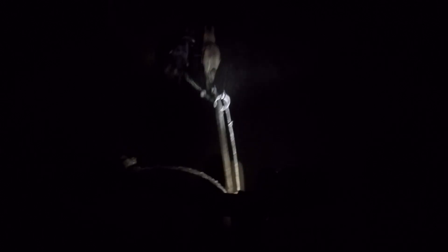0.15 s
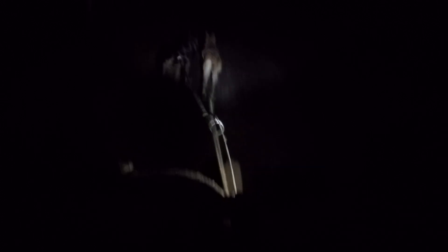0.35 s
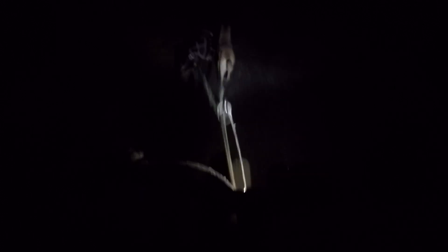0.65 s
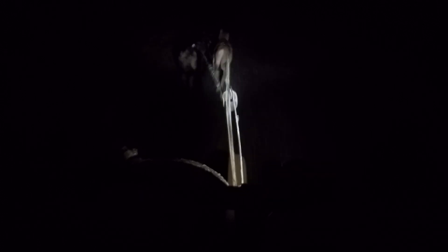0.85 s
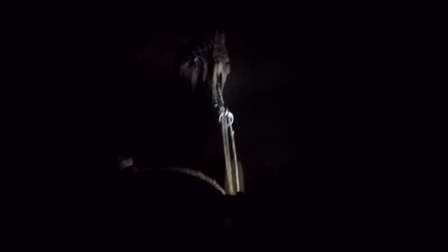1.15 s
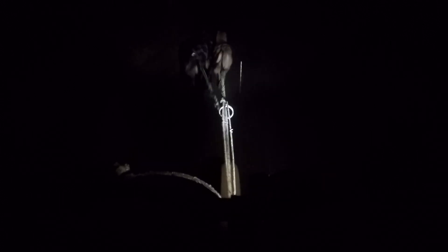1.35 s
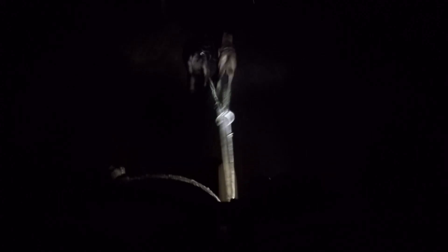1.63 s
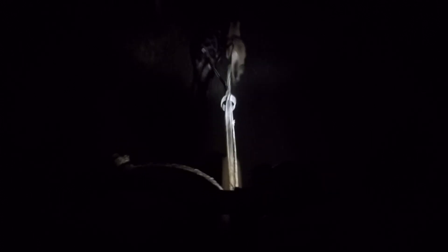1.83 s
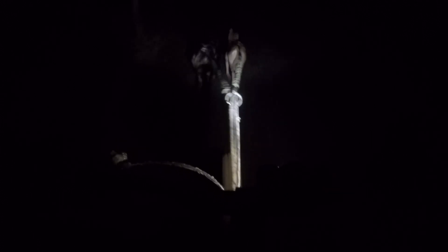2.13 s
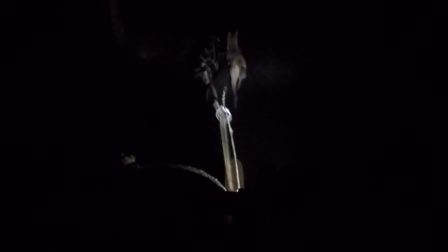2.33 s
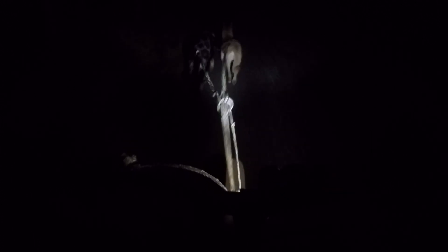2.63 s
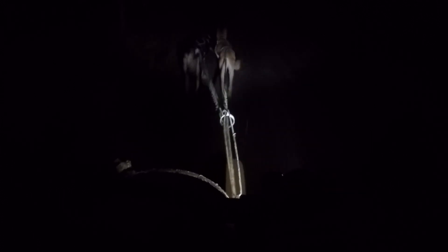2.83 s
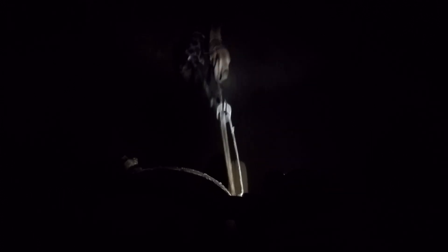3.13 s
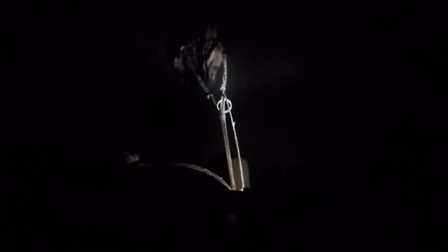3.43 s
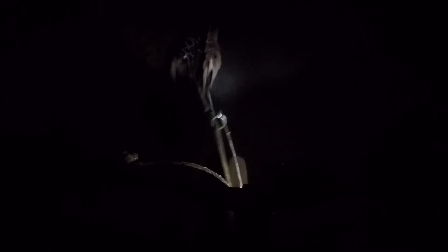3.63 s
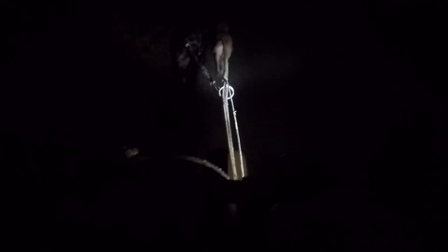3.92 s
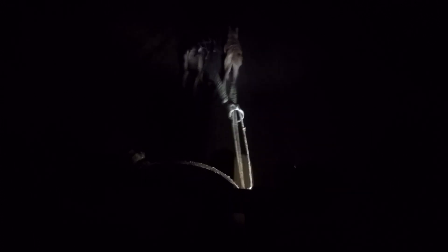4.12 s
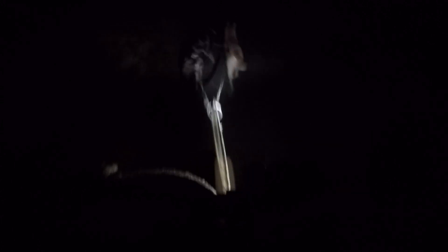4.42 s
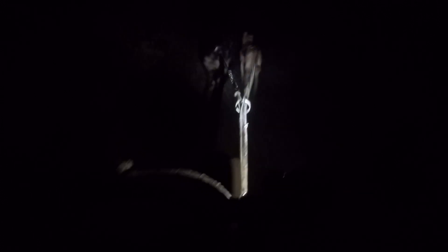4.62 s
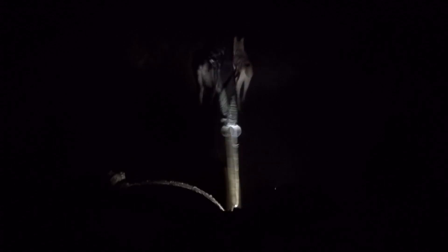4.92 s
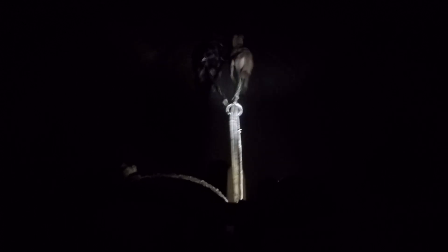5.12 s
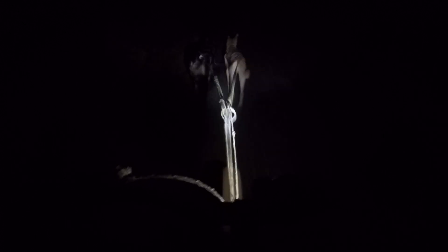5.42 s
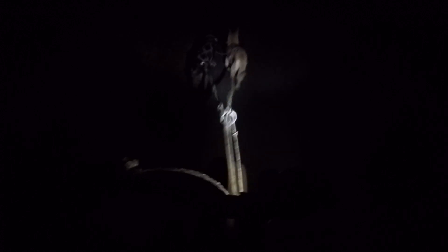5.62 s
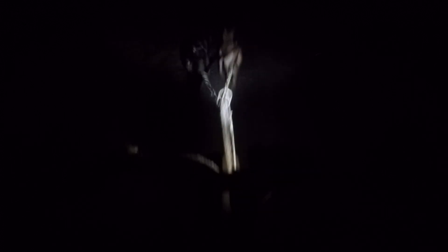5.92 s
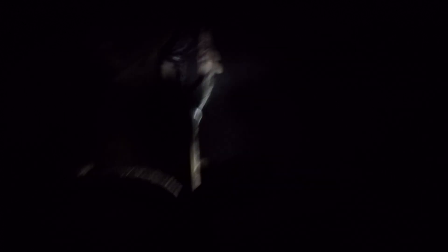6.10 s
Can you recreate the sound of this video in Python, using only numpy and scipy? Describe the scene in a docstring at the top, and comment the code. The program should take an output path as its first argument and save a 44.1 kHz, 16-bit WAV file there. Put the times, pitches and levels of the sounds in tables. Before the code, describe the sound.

A kick scooter rolls on a gritty track at night, heard from a microphone riding close on board. Grit keeps a fine, crackling metallic rattle going in the deck, stem and loose clamp, with irregular knocks and ticks. A sharp knock stands out after two seconds, then thumps come near three, five and the end. Low road drumming and soft wind buffeting lie beneath, outdoors with no echo.

```python
"""A gritty track at night: a kick scooter rolls along it, the microphone riding close on board.
Grit under the wheels shakes the deck, fork, stem tube and a loose clamp, each ringing briefly at its own
modes of noise-driven resonance; bigger stones knock, scuff, tick and spit, and edges thump the frame.
Beneath, the road drums through the frame and wind presses on the microphone as shaped low noise,
over a faint steady hiss of tyre and air."""
import sys
import numpy as np
from scipy import signal
from scipy.fft import rfft, irfft, next_fast_len
from scipy.io import wavfile
from scipy.ndimage import uniform_filter1d

SR = 44100
rng = np.random.default_rng(int(sys.argv[2]) if len(sys.argv) > 2 else 0)


def store_pcm(level_fs):
    """Save levels as 16-bit WAV."""
    pcm = np.round(np.clip(level_fs, -1, 1) * 32767).astype(np.int16)
    wavfile.write(sys.argv[1], SR, np.atleast_2d(pcm).T)


N = 276066

# How hard the grit shakes the frame. Each row: time in seconds, stem, deck and clamp level in [dB].
GRIT_SHAKING = [(0, -64, -69.5, -66.5), (.22, -61, -62.5, -70.5), (.36, -57.5, -60.5, -64),
                (.67, -61, -64, -68.5), (1.1, -61.5, -63.5, -68), (1.23, -55, -63.5, -61.5),
                (1.45, -64.5, -64.5, -70.5), (1.56, -57.5, -64, -69), (1.7, -63.5, -64.5, -70),
                (2.0, -60.5, -66.5, -70), (2.12, -65.5, -67.5, -71), (2.24, -59.5, -67, -68.5),
                (2.55, -61, -68.5, -67), (2.68, -55, -64.5, -65.5), (2.79, -60.5, -70, -72.5),
                (2.91, -54.5, -60, -62.5), (3.13, -62, -69, -70.5), (3.35, -66.5, -70.5, -72),
                (3.5, -63, -69.5, -68.5), (3.91, -62, -65, -70.5), (4.05, -57.5, -63.5, -65.5),
                (4.36, -56.5, -62.5, -67), (4.47, -55.5, -61, -67.5), (4.69, -54.5, -61, -63),
                (4.81, -58, -60, -65.5), (5.14, -57.5, -64.5, -67.5), (5.3, -58.5, -66, -66),
                (5.8, -57.5, -65, -66.5), (5.92, -56, -61, -63), (6.04, -58.5, -59, -64),
                (6.15, -59, -60, -70), (6.26, -51, -51, -58)]
# Rubs that swell briefly in the deck. Each row: middle in [s], level in [dB], width in [s].
DECK_RUBS = [(.05, -60, 0.025), (.14, -60, 0.06), (.23, -70, .03), (.45, -56, 0.029), (.56, -59, 0.02),
             (.86, -59, 0.04), (1.15, -74, 0.016), (1.24, -60.5, 0.045), (2.53, -60, 0.025),
             (2.82, -62, 0.05), (3.4, -59.5, 0.025), (3.85, -71, .03), (3.97, -61, 0.026),
             (4.06, -59, 0.027), (4.37, -60.5, 0.038), (4.88, -64, .04), (4.97, -60, 0.013),
             (5.3, -56, 0.0096), (5.37, -66.5, 0.017), (5.53, -57, 0.033), (5.91, -59, 0.066),
             (6.21, -56.5, 0.037)]

# Ringing modes of each part. Each row: frequency in [Hz], width in [Hz], relative level in [dB].
DECK_MODES = [(323, 104, -6.5), (463, 150, -10.5), (798, 140, -4.5), (899, 63, -0.5), (995, 61, 0),
              (1073, 86, -4.5)]
FORK_MODES = [(1325, 58, 2), (1605, 270, -3)]
STEM_MODES = [(1810, 380, -10.5), (2187, 112, 3.5), (2421, 122, 4), (2511, 73, 5), (2806, 180, 5.5),
              (3005, 109, 3.5), (3394, 178, 1.5), (3940, 140, -4.5)]
CLAMP_MODES = [(4360, 170, 3.5), (5320, 180, -12.5), (5105, 570, 8.5), (5300, 120, -7)]
# The fizz above the clamp and the spray of thin grit, with the same columns: [Hz], [Hz], [dB].
FIZZ_MODES = [(6820, 370, 3.5), (7930, 1200, -0.5), (8750, 720, 0), (9870, 770, -4)]
SPRAY_MODES = [(11040, 1200, -2.2), (12120, 540, 0.54), (13200, 1900, -0.78), (14400, 1400, -0.21)]

# Stones knocking through the stem. Each row: moment in [s], peak level in [dB].
STEM_KNOCKS = [(0.0266, -44), (0.3154, -37.5), (0.3552, -44), (0.4262, -42.5), (0.4444, -40), (0.4786, -45),
               (0.6537, -43), (0.8221, -39.5), (0.8458, -39.5), (0.8684, -42), (0.8904, -46), (0.9373, -47),
               (0.995, -42.5), (1.1398, -44), (1.1568, -41), (1.1922, -39), (1.208, -47), (1.2288, -41),
               (1.2604, -43), (1.295, -41.5), (1.3124, -44.5), (1.3944, -44.5), (1.48, -44), (1.4914, -44),
               (1.563, -47), (1.584, -43), (1.6033, -43.5), (1.6617, -45), (2.2394, -26.5), (2.3669, -38),
               (2.5277, -48), (2.6892, -44), (2.714, -45), (2.7606, -45), (2.8794, -39.5), (2.9183, -38.5),
               (2.9597, -41), (3.1308, -47.5), (3.1462, -39), (3.1956, -45), (3.3079, -43.5), (3.455, -45),
               (3.5418, -45.5), (3.6657, -44), (3.7847, -42), (4.052, -42), (4.0906, -46), (4.1888, -43),
               (4.203, -42), (4.2418, -44), (4.2986, -39.5), (4.3241, -51), (4.3595, -40), (4.3859, -45),
               (4.4196, -44), (4.5226, -43.5), (4.687, -39), (4.6957, -39), (4.7154, -41), (4.7628, -36.5),
               (4.791, -35), (4.8968, -48), (4.903, -43), (4.9352, -45), (4.9472, -40.5), (4.9552, -44),
               (4.9696, -39), (4.983, -43), (5.0389, -50), (5.0993, -37), (5.1146, -44), (5.1502, -44.5),
               (5.253, -39), (5.2958, -39), (5.324, -35), (5.4628, -32), (5.4794, -49), (5.6065, -37),
               (5.6298, -38), (5.636, -44), (5.6804, -44), (5.8333, -42), (5.901, -42), (5.9766, -47),
               (6.0412, -45.5), (6.0901, -43), (6.1244, -49.5), (6.2534, -29)]
# Ticks of the loose clamp. Each row: moment in [s], clamp peak in [dB], fizz peak in [dB].
CLAMP_TICKS = [(0.2743, -51, -59), (0.3147, -47, -52), (0.3257, -44, -54), (0.3561, -37, -54),
               (0.4564, -50, -56), (0.5881, -49, -61), (0.623, -45, -55), (0.8218, -41, -48),
               (0.845, -51, -53), (0.9373, -50, -56), (0.9956, -49, -64), (1.1263, -55, -55),
               (1.1393, -45, -52), (1.157, -38.5, -46), (1.1694, -41, -50), (1.1932, -40, -54),
               (1.2074, -43, -56), (1.2214, -51, -45.5), (1.229, -38, -47), (1.2471, -38, -48),
               (1.2624, -52, -52), (1.2945, -35, -48), (1.3508, -49, -59), (1.3673, -51, -62),
               (1.3947, -41.5, -59), (1.4797, -41, -52), (1.4914, -42.5, -50), (1.5044, -49, -57),
               (1.5254, -45, -54), (1.571, -40, -52), (1.5835, -35.5, -49), (1.6004, -42, -54),
               (2.2393, -48.5, -53), (2.367, -47.5, -50), (2.8799, -50, -61), (2.9664, -50, -54),
               (3.1453, -51, -60), (3.3074, -54, -56), (3.9739, -45.5, -61), (3.9908, -47, -58),
               (4.0522, -38, -47), (4.0741, -47, -54), (4.0906, -47, -61), (4.148, -46, -59),
               (4.1659, -51, -55), (4.2986, -48, -57), (4.3595, -52, -51), (4.376, -47, -58),
               (4.4184, -48, -56), (4.704, -45, -56), (4.7227, -46, -56), (4.7366, -44, -56),
               (4.8958, -42.5, -59), (4.9222, -47, -57), (5.0245, -47, -57), (5.0878, -50, -54),
               (5.1492, -46.5, -56), (5.2944, -50, -58), (5.3238, -49, -50), (5.4625, -54, -54),
               (5.6067, -46, -60), (5.6316, -50, -54), (5.6795, -46, -56), (5.6974, -50, -49),
               (6.0397, -48, -60), (6.0881, -51, -57)]
# Scuffs that boom in deck and fork. Each row: moment in [s], deck peak in [dB], fork peak in [dB].
DECK_FORK_SCUFFS = [(0.218, -54, -58), (0.31, -52, -48), (0.443, -53, -48), (0.739, -50, -70),
                    (1.22, -53, -52), (1.461, -69, -54), (2.239, -60, -41.5), (2.83, -55, -54),
                    (3.13, -66, -50), (3.144, -60, -47), (3.779, -66, -53), (4.109, -52, -59),
                    (4.683, -61, -51), (4.784, -55, -50), (4.972, -50, -60), (5.019, -62, -51),
                    (5.051, -53, -49), (5.098, -60, -47), (5.151, -55, -49.5), (5.296, -40.5, -44),
                    (5.683, -65, -48), (5.832, -57, -45), (5.892, -49, -60), (6.128, -51.5, -58),
                    (6.193, -46, -58), (6.211, -49, -55), (6.252, -54, -42)]
# Thin grit spitting from the tread. Each row: moment in [s], peak level in [dB].
TREAD_SPITS = [(0.0578, -58), (0.3162, -43), (0.4574, -51), (0.8215, -54), (0.8739, -51), (0.8884, -57),
               (1.1568, -54), (1.1694, -57), (1.1927, -56), (1.2306, -54), (1.2481, -55), (1.2945, -52),
               (1.3887, -58), (1.6636, -55), (1.6871, -54), (2.137, -59), (2.6419, -58), (2.9831, -54),
               (3.3892, -58), (3.7174, -61), (3.7773, -59), (3.7904, -60), (3.8023, -58), (3.9659, -59),
               (4.0522, -55), (4.2314, -59), (4.7037, -60), (4.7366, -58)]
# The wheel drops over an edge. Each row: start in [s], level before rise and decay in [dB],
# settled pitch in [Hz], decay time to -60 dB in [s], rise time in [s].
EDGE_THUMPS = [(2.805, -42, 133, 0.082, .008), (5.299, -40, 79.6, 0.11, 0.0021),
               (6.2, -35, 98, 0.31, 0.0069)]

# Level of the road drumming. Each row: time in [s], level in [dB].
ROAD_DRUMMING = [(0.0, -61), (0.07, -43.5), (0.1, -54.5), (0.45, -52), (0.56, -65), (0.59, -42),
                 (0.64, -51), (1.38, -53), (1.41, -50), (3.59, -55), (3.63, -52.5), (3.84, -56.5),
                 (4.01, -49.5), (4.31, -54.5), (4.48, -48.5), (4.55, -54.5), (5.27, -55), (5.32, -44.5),
                 (5.37, -59), (6.19, -48), (6.22, -40), (6.26, -54)]
# Gusts on the microphone. Each row: middle in [s], level in [dB], width in [s].
WIND_GUSTS = [(.05, -47.5, 0.036), (.26, -42, 0.057), (.41, -39.5, 0.032), (.62, -39.5, 0.12),
              (.84, -41.5, 0.077), (1.01, -43.5, 0.034), (1.11, -40, .04), (1.27, -42.5, 0.068),
              (1.5, -40, 0.074), (1.6, -41.5, 0.026), (1.69, -42.5, 0.042), (1.81, -43.5, 0.022),
              (1.93, -47.5, 0.043), (2.37, -44.5, 0.091), (2.61, -39, 0.026), (2.94, -41.5, 0.027),
              (3.17, -43.5, .07), (3.46, -47, 0.039), (3.63, -42.5, 0.016), (3.79, -45.5, 0.11),
              (4.11, -39, 0.084), (4.36, -40.5, 0.054), (4.48, -38.5, 0.02), (4.66, -42.5, 0.16),
              (5.0, -40, 0.083), (5.19, -36.5, 0.034), (5.35, -41, 0.028), (5.6, -46.5, 0.11),
              (5.86, -42.5, 0.035), (6.05, -44.5, 0.13)]
# Noise colours of road, wind and hiss. Each row: frequency in [Hz], relative density in [dB per Hz].
ROAD_COLOUR = [(40, -21), (62, -2), (85, 3.5), (100, -2), (120, -11), (145, -17), (175, -40.5), (260, -40)]
WIND_COLOUR = [(3, -34), (8, -9), (14, -6), (20, -0.5), (27, -0.5), (34, -5), (41, -14), (52, -16),
               (70, -21.5), (110, -59)]
HISS_COLOUR = [(88, -32), (150, 7.5), (572, -6.5), (1320, -6.5), (1980, -18), (2860, -3), (3760, -5),
               (5130, -11), (6110, -14), (14300, -37), (15500, -72)]

KNOCK_T60, TICK_T60, SCUFF_T60, SPIT_T60 = 0.023, 0.018, 0.022, 0.023  # chatter decay to -60 dB, s
# Fizz and spray follow the clamp: level at its mean shaking (dB) and share of its swings
FIZZ_DB, FIZZ_FOLLOW = -71.5, 0.44
SPRAY_DB, SPRAY_FOLLOW = -75.5, 0.28
BOUNCE_DB, BOUNCE_PER_S = 2, 12  # chance lumps in the drumming: rms depth, fastest rate
BREEZE_DB = -52  # steady wind under the gusts
HISS_DB = -63.5
EDGE_HZ = 15420  # upper band limit of the recorder


def rattle():
    """Grit shakes all parts at once, each part also chatters by itself, and rolling adds a steady force."""
    shared = jolts(240, spread_db=5.0, t60=0.03)
    stem_db = column(GRIT_SHAKING, count=1)
    deck_db = swells(DECK_RUBS, column(GRIT_SHAKING, count=2))
    clamp_db = column(GRIT_SHAKING, count=3)
    swing_db = clamp_db - clamp_db.mean()
    fizz_db = FIZZ_DB + FIZZ_FOLLOW * swing_db
    spray_db = SPRAY_DB + SPRAY_FOLLOW * swing_db
    # Each row: modes, level in dB, share of the common jolts, steady rolling force
    parts = [(DECK_MODES + FORK_MODES, deck_db, 0.4, 0.9),
             (STEM_MODES, stem_db, 0.6, 0.3),
             (CLAMP_MODES, clamp_db, 0.6, 0.4),
             (FIZZ_MODES, fizz_db, 0.55, 0.9),
             (SPRAY_MODES, spray_db, 0.3, 0.9)]
    out = np.zeros(N)
    for modes, db, share, steady in parts:
        own = jolts(300, spread_db=3.5, t60=0.0093)
        force = share * shared + (1 - share) * own + steady
        out += gain_of(db) * evened(ring(force, modes))
    return out


def jolts(per_s, spread_db, t60):
    """Force of many small stones: random moments, a few large, each pressing softly and dying quickly."""
    strength = gain_of(np.clip(spread_db, 0, 5) * np.minimum(rng.exponential(1, N), 3))
    hits = strength * (rng.random(N) < per_s / SR)
    force = signal.lfilter([1], [1, -gain_of(-60 / (t60 * SR))], hits)
    return evened(uniform_filter1d(force, size=70))  # softened over 70 samples


def ring(force, modes):
    """Every mode takes the force at its own spot of the part, so each gets its own fine grain."""
    out = 0
    for hz, width, db in modes:
        r = np.exp(-np.pi * width / SR)
        resonance = [1, -2 * r * np.cos(2 * np.pi * hz / SR), r * r]
        grain = force * rng.standard_normal(force.shape)
        out = out + gain_of(db) * (1 - r) * signal.lfilter([1, 0, -1], resonance, grain)
    # A part radiates little outside its own range
    edges = [0.8 * modes[0][0], min(1.15 * modes[-1][0], 0.45 * SR)]
    return signal.sosfilt(signal.butter(3, edges, "bandpass", fs=SR, output="sos"), out)


def knocks():
    """Bigger stones knock the stem, a hard contact ringing the tube's modes."""
    return blows(*np.transpose(STEM_KNOCKS), KNOCK_T60, STEM_MODES, rise=0.001508)


def ticks():
    """The loose clamp ticks, ringing its own modes and a higher fizz together."""
    s, clamp_db, fizz_db = np.transpose(CLAMP_TICKS)
    clamp = blows(s, clamp_db, TICK_T60, CLAMP_MODES, rise=0.00082)
    return clamp + blows(s, fizz_db, TICK_T60, FIZZ_MODES, rise=0.001)


def scuffs():
    """Scuffs boom in deck and fork, with a slower contact for the deck."""
    s, deck_db, fork_db = np.transpose(DECK_FORK_SCUFFS)
    deck = blows(s, deck_db, SCUFF_T60, DECK_MODES, rise=0.00345)
    return deck + blows(s, fork_db, SCUFF_T60, FORK_MODES, rise=0.00193)


def spits():
    """Thin grit spits from the tread in short bursts of high, broad resonances."""
    return blows(*np.transpose(TREAD_SPITS), SPIT_T60, SPRAY_MODES, rise=0.0022)


def blows(s, peak_db, t60, modes, rise):
    """Each blow is a short rounded contact and a decaying chatter; it rings one part."""
    t = np.arange(3000) / SR
    contact = (t / rise * np.exp(1 - t / rise)) ** 3
    chatter = 1.8 * (1 - np.exp(-t / rise)) * gain_of(-60 * t / t60)
    sounds = ring(np.tile(contact + chatter, (len(s), 1)), modes)
    out = np.zeros(N)
    for start, db, blow in zip(s, peak_db, sounds):
        add(out, max(start - rise / 2, 0), gain_of(db) * blow / abs(blow).max())
    return out


def thumps():
    """The frame springs on the tyre for some cycles, starting sharp and sagging in pitch."""
    t = np.arange(8000) / SR
    out = np.zeros(N)
    for s, db, hz, t60, rise in EDGE_THUMPS:
        turns = hz * (t + 0.0121 * (1 - np.exp(-t / 0.0031)))  # the pitch sags with a 3.1 ms constant
        envelope = gain_of(db - 60 * t / t60) * (1 - np.exp(-t / rise)) ** 2
        add(out, s, envelope * np.sin(2 * np.pi * turns))
    return out


def road_drumming():
    """The road drums through the frame on the tyre's bounce: low noise whose level comes in lumps."""
    db = column(ROAD_DRUMMING, count=1) + BOUNCE_DB * wander(BOUNCE_PER_S)
    return gain_of(db) * steadied(noise(ROAD_COLOUR), size=3000)


def wind():
    """Gusts over a steady breeze press on the microphone as very low noise."""
    return gain_of(swells(WIND_GUSTS, BREEZE_DB)) * steadied(noise(WIND_COLOUR), size=5000)


def hiss():
    """Tyre and air leave a faint hiss: coloured noise at a steady level."""
    return gain_of(HISS_DB) * noise(HISS_COLOUR)


def noise(spectrum):
    """Steady noise of the given colour, rms 1."""
    size = next_fast_len(N)
    hz = np.fft.rfftfreq(size, 1 / SR)
    f, db = np.transpose(spectrum)
    colour_db = np.interp(np.log(hz + 1), np.log(f + 1), db, left=-90, right=-90)
    shaped = rfft(rng.standard_normal(size)) * gain_of(colour_db)
    return evened(irfft(shaped, size)[:N])


def steadied(x, size):
    """Noise with its own chance swells reduced by its running power over size samples, rms 1."""
    power = abs(uniform_filter1d(x ** 2, size=size))
    return evened(x / np.sqrt(power + 0.099))


def wander(per_s):
    """Slow chance, rms 1: sines of random phase up to per_s a second."""
    t = np.arange(0, N + 256, 256) / SR  # coarse time grid
    rates = per_s * np.geomspace(0.2, 1, 24)
    x = sum(np.sin(2 * np.pi * (f * t + rng.random())) for f in rates)
    return np.interp(np.arange(N) / SR, t, evened(x))


def swells(rows, floor_db):
    """Level in dB of bell-shaped swells, their power added to a floor."""
    t = np.arange(0, N + 256, 256) / SR  # coarse time grid
    power = sum(gain_of(2 * db) * np.exp(-((t - s) / width) ** 2) for s, db, width in rows)
    return 10 * np.log10(np.interp(np.arange(N) / SR, t, power) + gain_of(2 * floor_db))


def column(table, count):
    """One column of a curve table, interpolated sample by sample."""
    rows = np.array(table)
    return np.interp(np.arange(N) / SR, rows[:, 0], rows[:, count])


def gain_of(db):
    """Decibels to an amplitude factor."""
    return 10 ** (np.asarray(db) / 20)


def evened(x):
    """Scaled to rms 1."""
    return x / np.sqrt(np.mean(x ** 2) + 1e-20)


def add(mix, s, sound):
    """Mixes a sound in at s seconds, cut off at the end of the mix."""
    part = mix[round(s * SR):][:len(sound)]
    part += sound[:len(part)]


def scene():
    """The ride from the rattling frame close by down to the faint hiss, in one channel."""
    blows_on_frame = knocks() + ticks() + scuffs() + spits() + thumps()
    background = road_drumming() + wind() + hiss()
    return (rattle() + blows_on_frame + background)[None]


def record(dry):
    """The band limit of the recorder: a steep low-pass."""
    low_pass = signal.firwin(511, EDGE_HZ, window=("kaiser", 9), fs=SR)
    return signal.oaconvolve(dry, low_pass[None], "same")


dry = scene()
out = record(dry)
store_pcm(out)
```